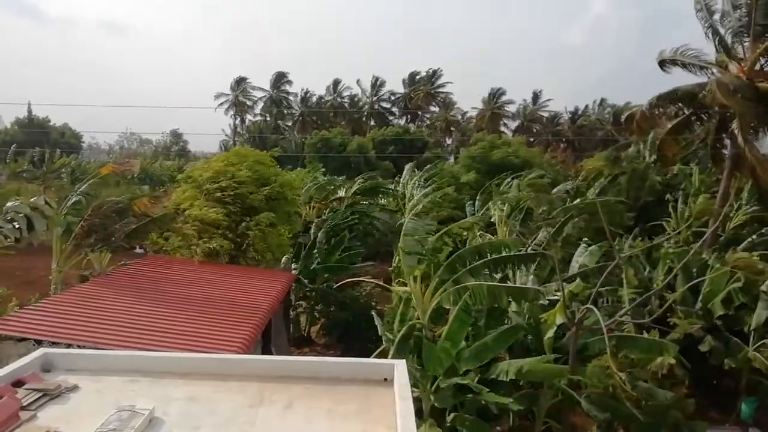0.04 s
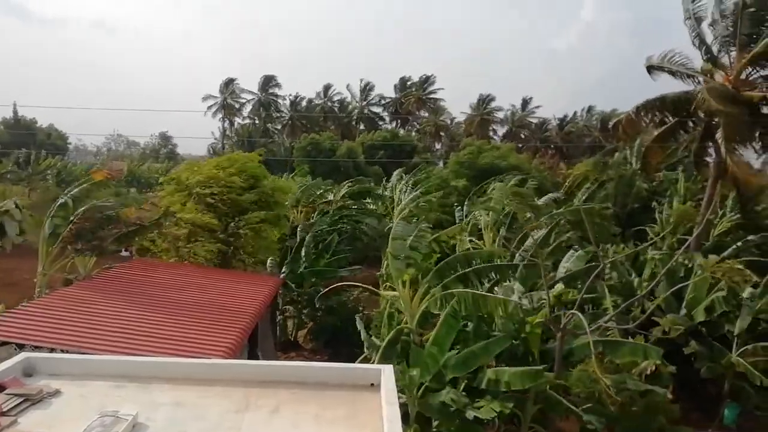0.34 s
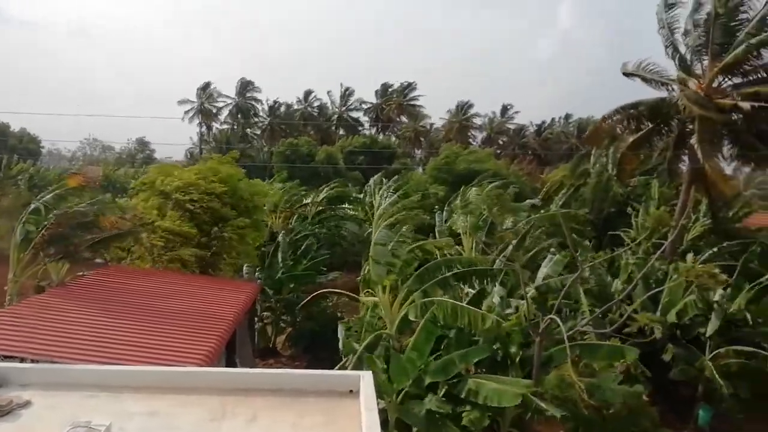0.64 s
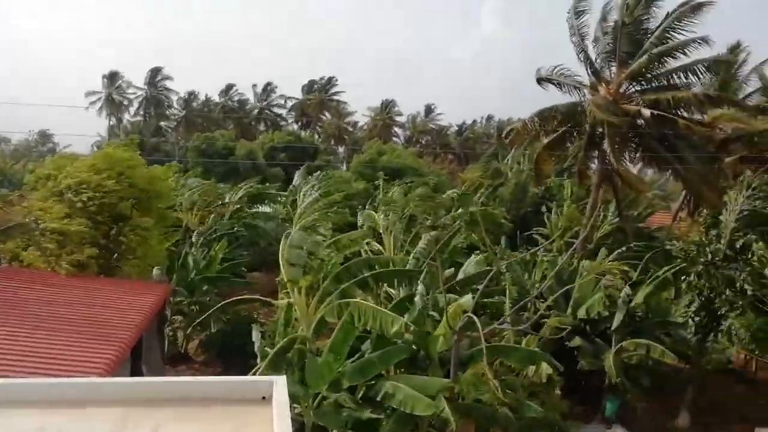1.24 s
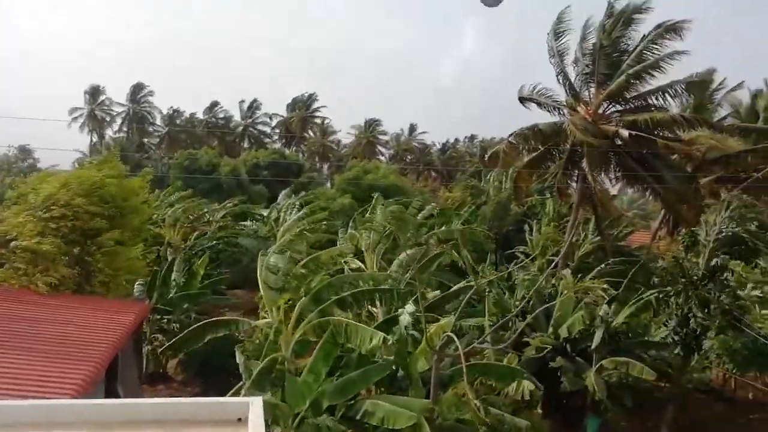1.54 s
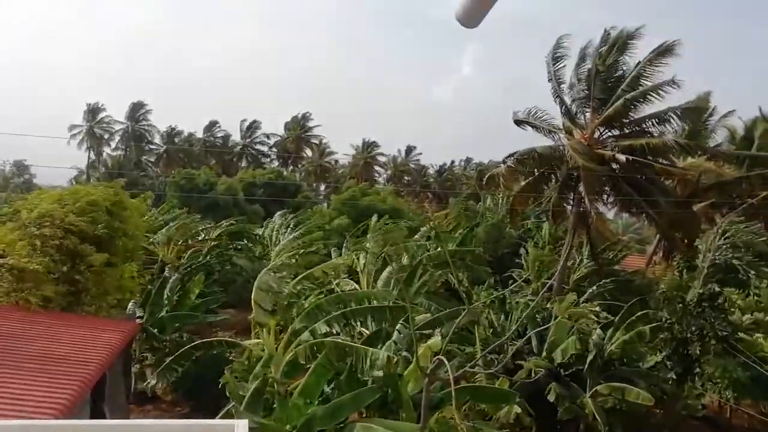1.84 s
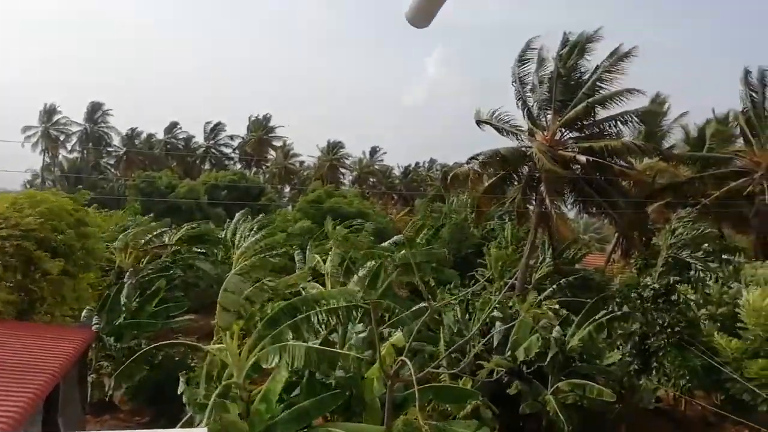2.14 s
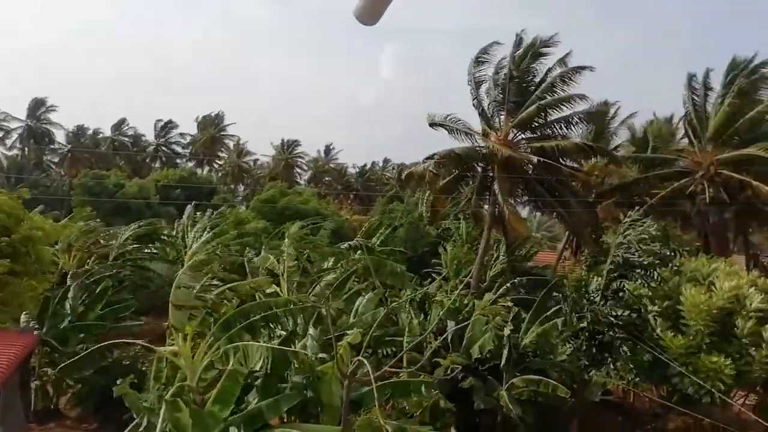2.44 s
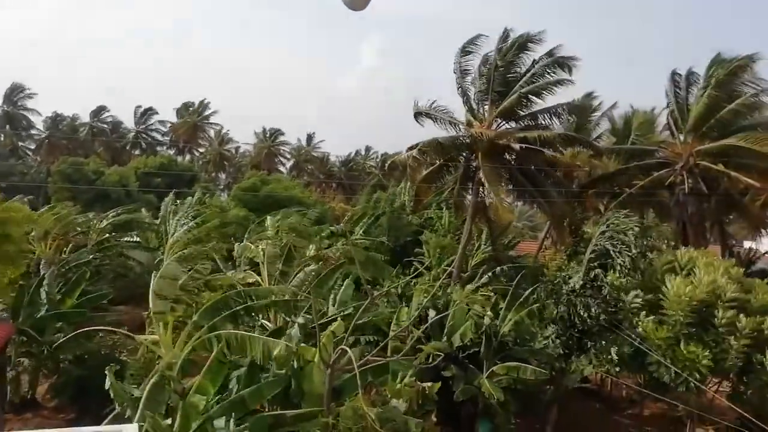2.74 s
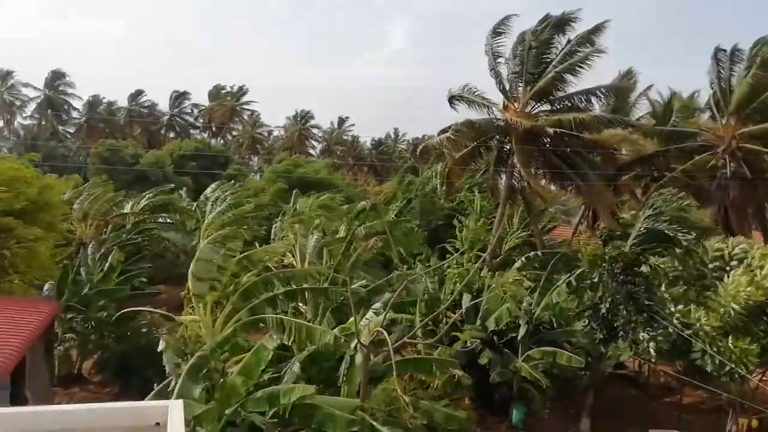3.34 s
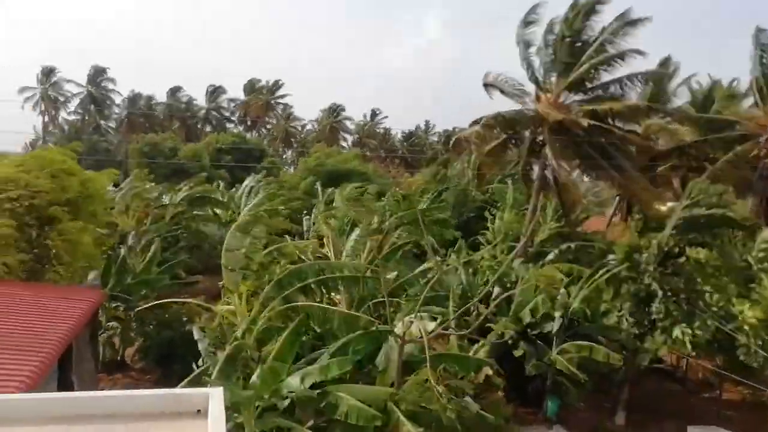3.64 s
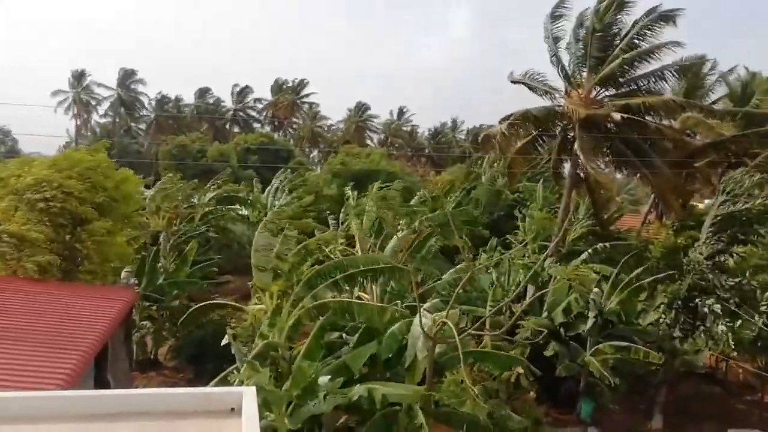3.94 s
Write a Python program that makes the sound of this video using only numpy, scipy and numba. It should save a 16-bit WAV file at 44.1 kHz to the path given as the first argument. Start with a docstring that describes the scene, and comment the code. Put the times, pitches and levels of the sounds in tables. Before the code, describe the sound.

Wind buffets the microphone with a low, uneven rumble over the steady hiss of banana and palm leaves. Light puffs and thumps come in the first second, followed by a lull. A hard, ragged gust hits at about 1.8 seconds, then eases. From around 2.8 seconds the buffeting builds again, with thicker puffs and low thumps that are strongest from 3.5 to 4 seconds.

```python
"""A gusting rumble and ragged puffs of wind buffet a microphone over the steady hiss of leaves.
Turbulent eddies press on its two ports; the harder puffs tend to be brighter, large eddies thump,
and one gust rings a cavity. Around the roof terrace, countless banana and palm leaves rustle and
patter, their sounds adding up to broadband noise. The gain ducks under the hardest gusts."""
import sys
import numpy as np
from scipy import signal
from scipy.fft import rfft, irfft
from scipy.io import wavfile
from scipy.ndimage import uniform_filter1d
from numba import njit

SR = 44100
rng = np.random.default_rng(int(sys.argv[2]) if len(sys.argv) > 2 else 0)


def transcribe(u):
    """Save the signal u as a 16-bit wav file named by the first command-line argument.

    u: samples, shape (n,) or (channels, n), limited to [-1, 1]; the rate is SR.
    q: integer samples, one column per channel.
    """
    v = np.clip(np.atleast_2d(u).T, -1, 1)
    q = np.round(v * 32767).astype(np.int16)
    wavfile.write(sys.argv[1], SR, q)


N = 176400

# Strength of the wind at the ports. Each row: time in seconds, relative rumble level in dB.
GUST_LEVELS = [(0.0, -38), (0.09, -43), (0.15, -27), (0.41, -31), (0.5, -39.5), (0.57, -27.5), (0.66, -35),
               (0.76, -27), (0.82, -35.5), (0.96, -26), (1.06, -37.5), (1.17, -30), (1.22, -44.5),
               (1.36, -46), (1.63, -38.5), (1.73, -33.5), (1.77, -15), (1.84, -30), (1.87, -17.5),
               (2.03, -37), (2.08, -38), (2.26, -37.5), (2.29, -31), (2.44, -27.5), (2.65, -43),
               (2.76, -38.5), (2.83, -25), (2.9, -21.5), (2.97, -45), (3.0, -31), (3.07, -41), (3.2, -23.5),
               (3.33, -25), (3.35, -40), (3.379, -23.5), (3.54, -21.5), (3.66, -15.5), (3.72, -21),
               (3.8, -20), (3.89, -23), (3.92, -14), (4.0, -20.5)]
# Spectrum of the slow eddies. Each row: frequency in Hz, relative spectral density in dB.
RUMBLE_SPECTRUM = [(10, -14.5), (25, -2), (50, -0.5), (85, 0.5), (160, -4.5), (230, -10), (320, -13.5),
                   (500, -25.5)]
# Puffs of air striking the ports. Each row: start in seconds, length in seconds, relative level in dB,
# cut-off in Hz, excess of the left port over the right in dB.
PUFF_EVENTS = [(0.003, 0.089, -32.5, 520, 7), (0.155, 0.13, -29, 510, 5), (0.298, 0.081, -30.5, 750, 12),
               (0.443, 0.076, -30, 480, 7), (0.523, 0.0041, -20.5, 870, 12.5), (0.731, 0.068, -26, 477, 10),
               (0.814, 0.059, -28, 584, 7), (0.906, 0.026, -31, 446, 12), (0.976, 0.029, -28.5, 590, 6.5),
               (1.072, 0.031, -33, 450, 7.5), (1.146, 0.0069, -31.5, 423, 4), (1.624, 0.011, -24, 517, 5),
               (1.744, 0.006, -18.5, 900, -9), (1.756, 0.024, -14, 820, -21),
               (1.792, 0.0089, -14, 790, -20), (1.81, 0.0085, -9, 730, -14), (1.829, 0.09, -28, 560, -21),
               (1.844, 0.028, -19, 680, -16), (1.973, 0.011, -17.5, 380, -20),
               (2.002, 0.031, -22.5, 374, 3), (2.113, 0.028, -33, 423, 7), (2.32, 0.099, -35, 330, 16),
               (2.803, 0.077, -25.5, 534, -9), (3.127, 0.0099, -25, 530, 11), (3.205, 0.014, -20, 472, 2),
               (3.262, 0.036, -25.5, 430, 4.5), (3.377, 0.0081, -15.5, 970, -13),
               (3.401, 0.14, -22.5, 605, -10), (3.468, 0.025, -18, 740, 11),
               (3.497, 0.015, -15.5, 1240, 29), (3.532, 0.0074, -15.5, 940, 13),
               (3.552, 0.06, -28, 550, -6), (3.61, 0.05, -17, 625, -8.5), (3.667, 0.018, -14, 950, -12),
               (3.715, 0.014, -18.5, 1030, 9), (3.74, 0.06, -29, 430, 4), (3.803, 0.0096, -20.5, 825, 8),
               (3.827, 0.025, -12, 690, -3), (3.865, 0.0083, -13.5, 670, -7), (3.901, 0.026, -20, 450, 10),
               (3.924, .01, -13, 1150, 16), (3.94, 0.0088, -12, 1030, 21), (3.958, 0.049, -13.5, 580, -6.5)]
# Spectrum of a puff. Each row: frequency as a multiple of the cut-off, relative spectral density in dB.
PUFF_SPECTRUM = [(.06, -46), (.2, 1), (.4, -1), (.7, -4.5), (1, -12), (1.35, -20), (1.9, -37.5), (3, -66)]
# Lone large eddies. Each row: time in seconds, relative peak level in dB, centre frequency in Hz.
LARGE_EDDIES = [(0.735, -27.5, 149), (0.773, -18, 190), (0.948, -23, 95), (0.978, -19, 94),
                (1.348, -33, 188), (1.864, -10.5, 172), (2.42, -24, 89), (2.834, -18, 149),
                (3.264, -14, 150), (3.323, -16, 99), (3.546, -8, 130), (3.646, -17, 110), (3.679, -9, 130),
                (3.923, -3.5, 100)]
# Leaf hiss on either side. Each row: frequency in Hz, relative spectral density in dB.
LEFT_LEAF_SPECTRUM = [(100, -25), (400, -8.5), (700, 1), (1200, 3), (2000, 1), (3200, 2), (3800, -2.5),
                      (5000, -1), (6400, -5.5), (7600, -17), (8100, -6), (9300, -24), (9900, -7),
                      (10800, -9), (12000, -6.5), (14000, -10), (14800, -0.5), (15600, -21)]
RIGHT_LEAF_SPECTRUM = [(100, -5), (400, -11), (700, -8), (1200, -4), (1700, -5.5), (2900, -4), (4000, -5.5),
                       (5400, -6), (6300, -1), (7050, 2), (7700, -5.5), (9300, -9), (9900, -7),
                       (10700, -14), (12300, -15.5), (14000, -23), (14950, -17), (15400, -36)]
# Swell of the leaves in the wind. Each row: time in seconds, gain of the hiss in dB.
LEAF_SWELL = [(0, -0.5), (1.25, 0.1), (1.55, 0), (2.7, 0.66), (3.5, -0.5), (4, 0.5)]

TIME = np.arange(N) / SR
BIN_HZ = np.arange(N // 2 + 1) * SR / N


def buffeting(lag_s=0.00083, bass_leak=0.98, treble_leak=0.26, corner_hz=258):
    """Crosstalk: each channel takes its own port at once and the other later, most fully in the bass."""
    ports = np.array([rumble(), rumble()]) + puffs() + thumps() + knock()
    leak = treble_leak + (bass_leak - treble_leak) / (1 + (BIN_HZ / corner_hz) ** 2)
    return ports + delay(irfft(rfft(ports[::-1]) * leak, N), lag_s)


def rumble():
    """Turbulent pressure: large slow eddies load one port, their strength following the gusts."""
    when, db = np.array(GUST_LEVELS).T
    return eddies(RUMBLE_SPECTRUM) * undb(np.interp(TIME, when, db)) / np.sqrt(2)


def eddies(spectrum, size=N, evenness=0.31, span_s=0.096):
    """Shot noise: random pressure pulses overlap at a port, their running power partly evened out."""
    pressure = colour(impulses(per_s=1500, spread_db=2.5, size=size), spectrum)
    span = int(span_s * SR)
    power = uniform_filter1d(uniform_filter1d(pressure ** 2, span), span // 2)
    return unit(pressure / np.maximum(power, 1e-9) ** (evenness / 2))


def puffs(size=8192, attack_s=0.002, release_s=0.003, flutter_db=3, lift_db=1.5):
    """Intermittency: faster eddies come in ragged bursts, their power split unevenly between ports."""
    ports, age = np.zeros((2, N + size)), np.arange(size) / SR
    for start, length, db, cut_hz, left_db in PUFF_EVENTS:
        envelope = np.minimum(age / attack_s, 1) * np.exp(-np.maximum(age - length, 0) / release_s)
        ragged = envelope * undb(flutter_db * wander(rate_hz=102, size=size))
        strength = undb(db + lift_db) * np.sqrt(np.mean(envelope ** 2))
        spectrum = [(ratio * cut_hz, level) for ratio, level in PUFF_SPECTRUM]
        onset = int(start * SR)
        for port, lean_db in enumerate((left_db, -left_db)):
            share = 1 / np.sqrt(1 + undb(-lean_db) ** 2)
            ports[port, onset:onset + size] += share * strength * unit(ragged * eddies(spectrum, size))
    return ports[:, :N]


def thumps():
    """Convection: a passing eddy is a pressure dip between gentler rises, briefer for a smaller eddy."""
    pressure = np.zeros(N)
    for when, db, hz in LARGE_EDDIES:
        offset_squared = (2 * np.pi * hz * (TIME - when)) ** 2
        pressure -= undb(db) * (1 - offset_squared) / (1 + offset_squared) ** 2
    return pressure


def knock(start_s=3.379, ring_hz=685, attack_s=0.002, decay_s=0.0052, gain_db=-10):
    """Cavity resonance: a sudden push of air rings the hollow behind the right port for a few cycles."""
    age = np.maximum(TIME - start_s, 0)
    envelope = np.minimum(age / attack_s, 1) * np.exp(-np.maximum(age - attack_s, 0) / decay_s)
    ring = undb(gain_db) * envelope * np.sin(2 * np.pi * ring_hz * age)
    return np.array([np.zeros(N), ring])


def foliage(shared_power=0.065, lag_s=0.00056, left_db=-43.5, right_db=-37.5):
    """Partial coherence: leaves hiss all around, so little of their sound is common to both ports."""
    common = np.sqrt(shared_power) * rustle()
    left = np.sqrt(1 - shared_power) * rustle() + delay(common, lag_s)
    right = np.sqrt(1 - shared_power) * rustle() + common
    hiss = np.array([undb(left_db) * colour(left, LEFT_LEAF_SPECTRUM),
                     undb(right_db) * colour(right, RIGHT_LEAF_SPECTRUM)])
    when, db = np.array(LEAF_SWELL).T
    return sway_band(hiss) * undb(np.interp(TIME, when, db))


def rustle(patter_gain=0.4, flicker_db=0.5):
    """Superposition: distant leaves merge into a flickering hiss; nearer ones patter on each other."""
    patter = patter_gain * unit(impulses(per_s=2500, spread_db=3.2))
    return (rng.standard_normal(N) + patter) * undb(flicker_db * wander(rate_hz=21))


def sway_band(hiss, centre_hz=3140, width_hz=860, lift_db=1.42, sway_db=0.13):
    """Amplitude modulation: the middle band of the hiss is lifted, and waxes and wanes slightly."""
    band = irfft(rfft(hiss) * np.exp(-((BIN_HZ - centre_hz) / width_hz) ** 2), N)
    gain = undb(lift_db + sway_db * wander(rate_hz=5))
    return hiss + band * (gain - 1)


def impulses(per_s, spread_db, size=N):
    """Poisson process: pushes of random sign and strength arrive at independent moments."""
    arrivals = rng.random(size) < per_s / SR
    signs = np.sign(rng.standard_normal(size))
    return arrivals * signs * undb(spread_db * rng.exponential(size=size))


def wander(rate_hz, size=N):
    """Low-pass noise: a smooth random drift with zero mean and unit spread."""
    f = np.arange(size // 2 + 1) * SR / size
    low_pass = np.exp(-(f / rate_hz) ** 2) * (f > 0)
    return unit(irfft(rfft(rng.standard_normal(size)) * low_pass, size))


def colour(x, spectrum):
    """Spectral shaping: the gain follows (Hz, dB) points, then falls 12 dB an octave; the rms is 1."""
    hz, db = np.array(spectrum, float).T
    f = np.maximum(np.arange(len(x) // 2 + 1) * SR / len(x), 1)
    gain = undb(np.interp(np.log(f), np.log(hz), db)) / np.maximum(f / hz[-1], 1) ** 2
    return unit(irfft(rfft(x) * gain, len(x)))


def delay(x, seconds):
    """Shift theorem: a phase lag proportional to frequency is a circular delay."""
    return irfft(rfft(x) * np.exp(-2j * np.pi * BIN_HZ * seconds), N)


def undb(db):
    """Decibel law: every 20 dB is a factor of ten in amplitude."""
    return 10 ** (np.asarray(db) / 20)


def unit(x):
    """Normalisation: the signal is scaled to an rms of 1."""
    return x / np.sqrt(np.mean(x ** 2) + 1e-18)


@njit
def follow(magnitude, attack_s, release_s):
    """Envelope detection: the level rises with one time constant and falls with another."""
    envelope, level = np.empty(len(magnitude)), 0.
    for i in range(len(magnitude)):
        time_constant = attack_s if magnitude[i] > level else release_s
        level += (magnitude[i] - level) / (time_constant * SR)
        envelope[i] = level
    return envelope


def scene():
    """Superposition: the sound of the leaves adds to the wind pressure on the microphone."""
    return foliage() + buffeting()


def record(dry, threshold_db=-18, ratio=1.29, ceiling=0.93, top_hz=15650):
    """Compression ducks the hard gusts, saturation rounds the peaks and a steep low-pass cuts the top."""
    level = follow(np.abs(dry).max(axis=0), attack_s=0.0032, release_s=0.07)
    gain = np.maximum(level / undb(threshold_db), 1) ** (1 / ratio - 1)
    rounded = ceiling * np.tanh(dry * gain / ceiling)
    low_pass = signal.ellip(10, 0.2, 80, top_hz, fs=SR, output="sos")
    return signal.sosfilt(low_pass, rounded)


dry = scene()
out = record(dry)
transcribe(out)
```